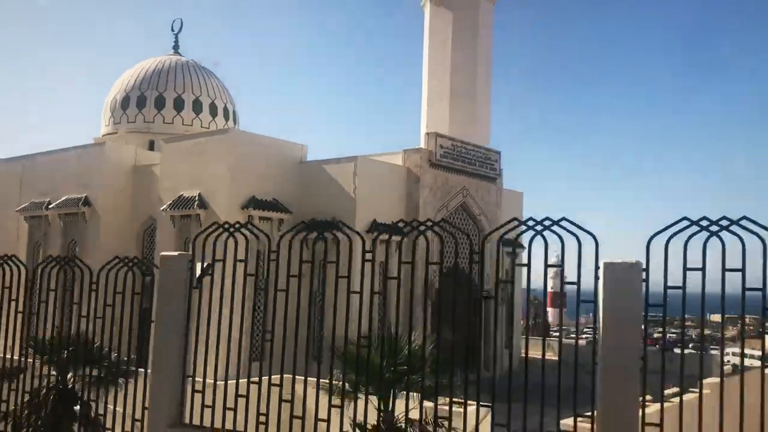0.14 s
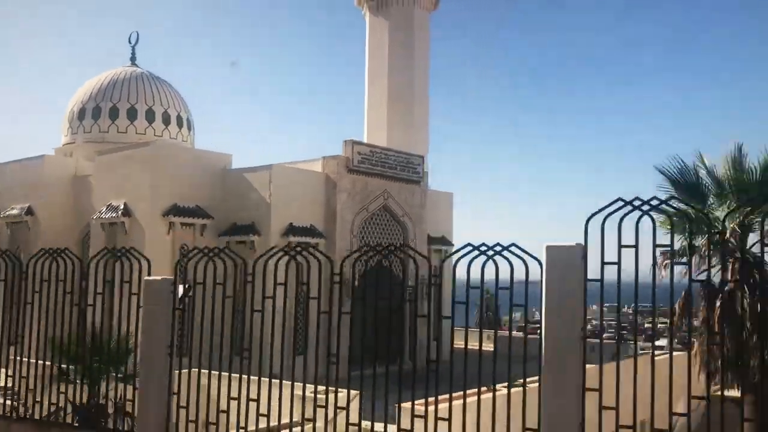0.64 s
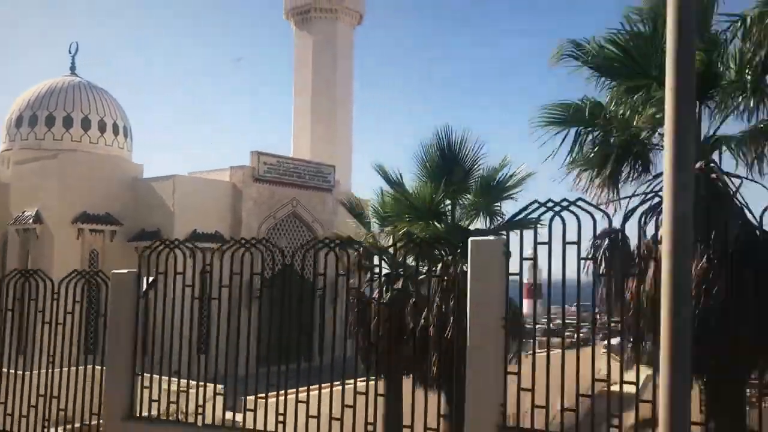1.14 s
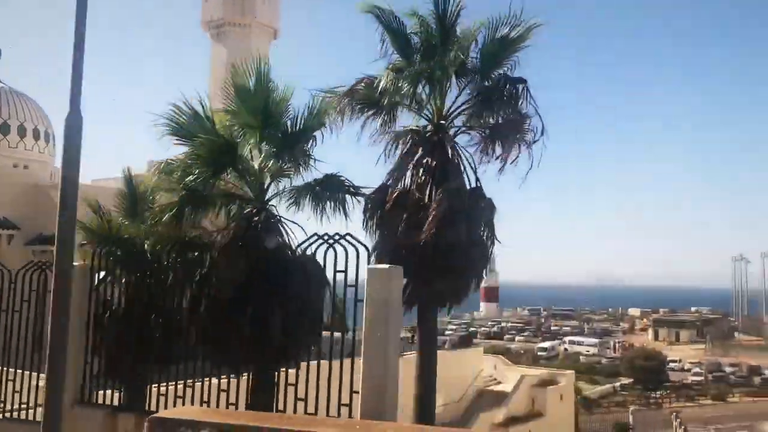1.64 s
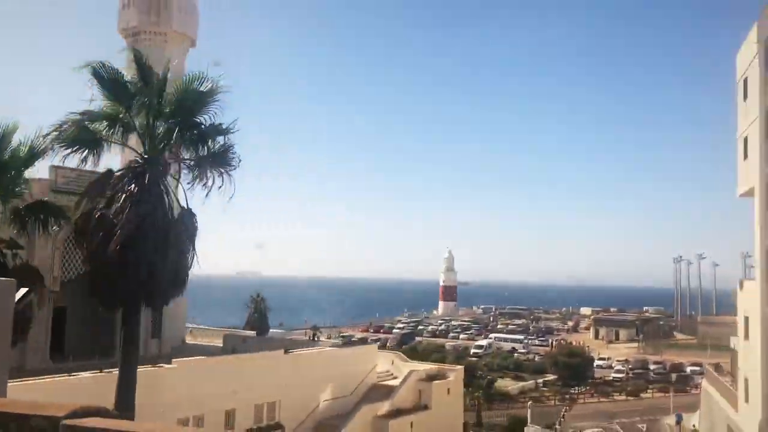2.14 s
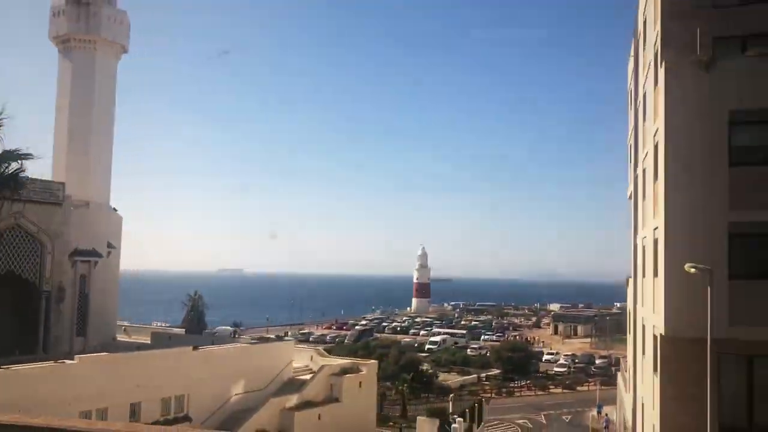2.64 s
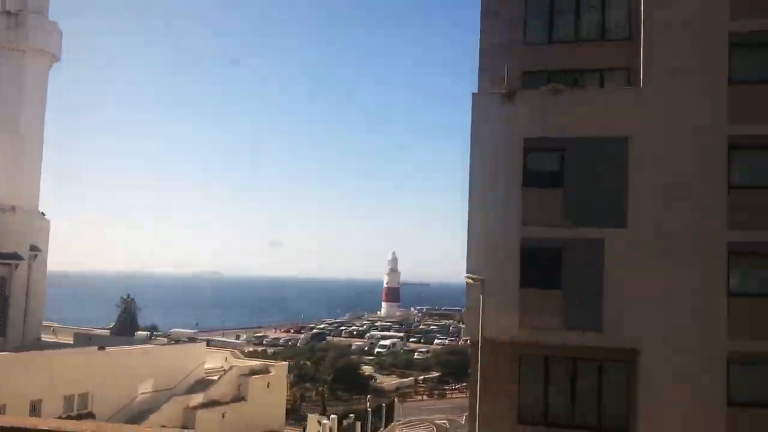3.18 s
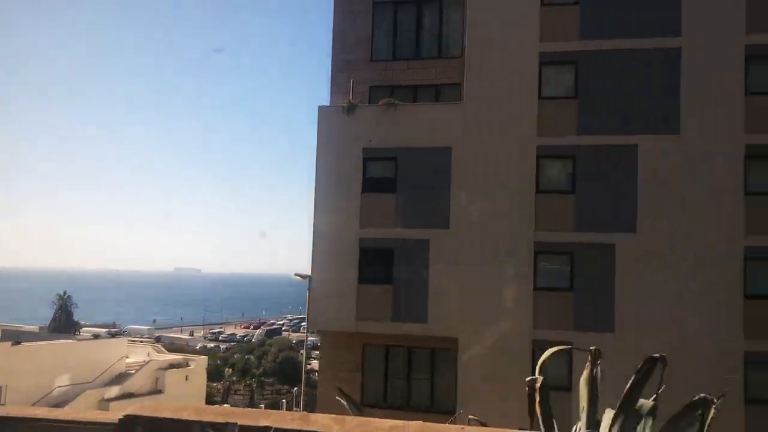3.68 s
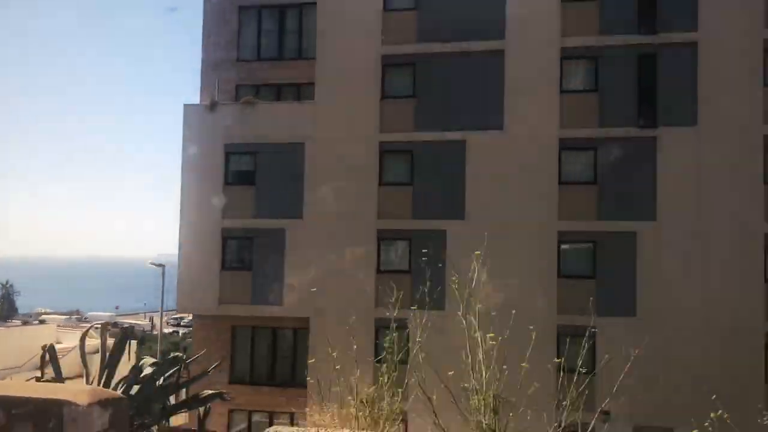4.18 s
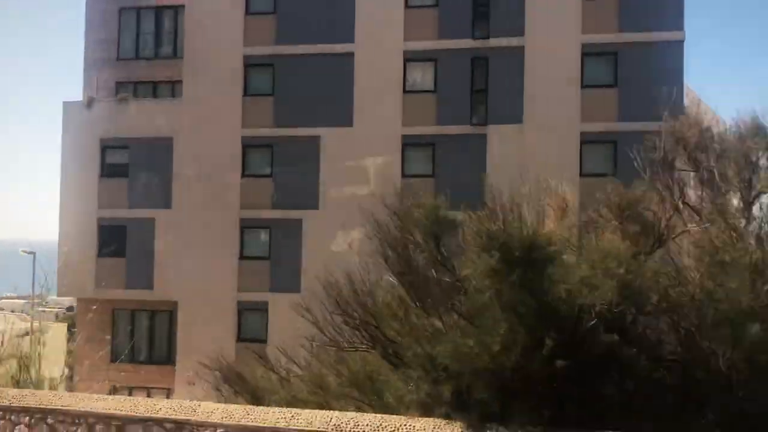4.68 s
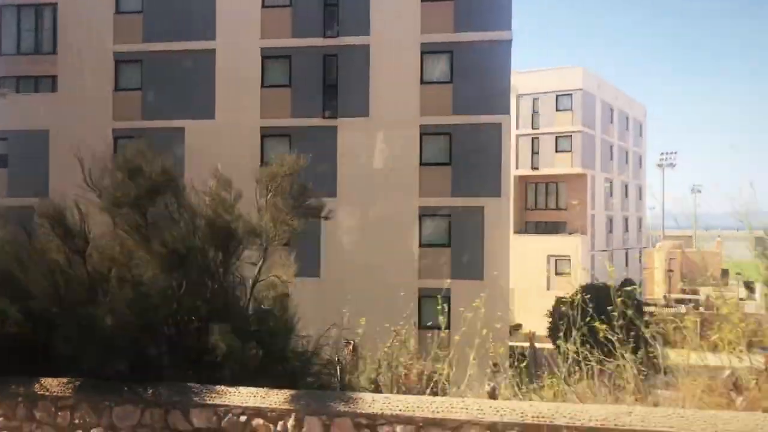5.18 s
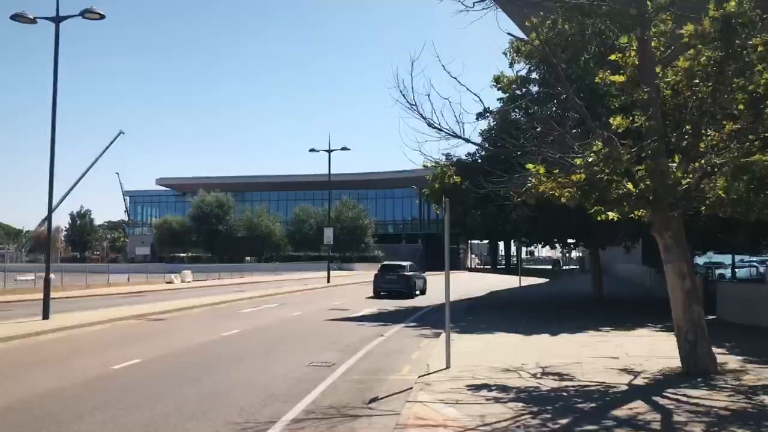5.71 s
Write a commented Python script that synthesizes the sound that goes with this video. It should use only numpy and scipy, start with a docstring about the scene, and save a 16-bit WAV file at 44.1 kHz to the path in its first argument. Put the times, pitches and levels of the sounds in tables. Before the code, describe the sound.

A bus cabin drones and rumbles, trim and windows chatter around a deep thump, then a hard cut leaves softer road noise and one thud.

```python
"""Inside a bus that slowly gathers speed: a six-cylinder diesel, built from sine lines on multiples of its
cycle, drones over a road roar of coloured noise. Trim, then windows and wall panels rattle in chattering
bursts of ringing noise. Around 3 s bumps thump the body with low decaying rings, and the drone briefly dips.
Near the end the sound cuts with a click, a wave chopped at its crest, to a quieter stretch of road noise,
where one joint thumps under the wheels."""
import sys
import numpy as np
from scipy import signal
from scipy.fft import rfft, irfft
from scipy.io import wavfile
from scipy.ndimage import uniform_filter1d

SR = 44100
rng = np.random.default_rng(int(sys.argv[2]) if len(sys.argv) > 2 else 0)


def gain_from_db(level_db):
    """Convert decibel levels to linear amplitude factors (20 dB per decade)."""
    decades = np.asarray(level_db, float) / 20
    return 10 ** decades


def store_pcm(level_fs):
    """Save levels as 16-bit WAV."""
    pcm = np.round(np.clip(level_fs, -1, 1) * 32767).astype(np.int16)
    wavfile.write(sys.argv[1], SR, np.atleast_2d(pcm).T)


N = 256818
T = np.arange(N) / SR
CUT_S = 5.6536  # the first road ends here

# narrow dips in the treble, where an echo close to the microphone cancels it:
# (centre [Hz], width [Hz], gain [dB])
ECHO_DIPS = [(4890, 230, -3.5), (7720, 240, -2.5), (10550, 620, -3.5)]
# spectrum of the quieter road: (frequency [Hz], relative density [dB per Hz])
QUIET_ROAD_COLOUR = [(20, -19), (60, -1), (110, -6.5), (200, -10.5), (380, -26), (500, -24), (800, -25.5),
                     (1100, -23.5), (1700, -29.5), (2270, -36.5), (3450, -40.5), (7000, -52), (15800, -65)]
# layers of the roar, boom, rumble, tyre roar and hiss:
# (mean level [dB], share of the surface curve [ratio], slow swell [dB], flicker [dB], flicker rate [per s])
ROAR_LAYERS = [(-35.5, 1, 0.5, 1., 5.88), (-35, 0.6, 0.66, 0.62, 11), (-41, 0.59, 0.13, 0.16, 12),
               (-52.5, 0.93, 0.47, 0.78, 22)]
# cabin colour of the roar: (frequency [Hz], relative density [dB per Hz])
CABIN_COLOUR = [(22, -24), (31, -10), (41, -12), (52, -7), (70, -10.5), (105, -13), (128, -16), (170, -8),
                (300, -16), (370, -17), (414, -19.5), (710, -21), (857, -25), (1390, -25), (1640, -29.5),
                (2590, -31), (4300, -43.5), (11600, -57), (13500, -61), (15800, -66)]
# coarseness of the road surface: (time [s], level [dB])
SURFACE_COARSENESS = [(0, -.5), (1.3, -0.5), (2, 1), (2.84, 1.5), (3.5, 1.5), (3.96, -0.5), (4.62, 1.2),
                      (5.07, -0.5), (5.48, 1.5), (5.65, -1)]
# narrow panel resonances ringing steadily in the roar: (centre [Hz], width [Hz], level [dB])
PANEL_RESONANCES = [(1775, 70, -59), (2537, 24, -64), (11730, 30, -87)]
# what each rattling part rings, the trim with a main and a top ring:
# (centre [Hz], width [Hz], relative level [dB])
TRIM_MAIN_RING = [(5500, 3100, -0.5), (8500, 4800, -4.5)]
TRIM_TOP_RING = [(11100, 3300, 3), (14000, 4000, -14)]
GLASS_RING = [(2750, 900, 0), (3700, 1300, -2)]
PANEL_RING = [(1040, 800, 8), (1660, 500, -6.5)]
# loose trim rattles: (time [s], level [dB], brightness = top ring against main ring [dB])
TRIM_JOLTS = [(.446, -57, -4), (1.13, -65, -3), (1.21, -63, -5), (1.42, -60, -4), (1.6, -55, -13),
              (1.83, -58, -13), (1.894, -54.5, -13), (2.12, -65, 0), (2.4, -64, -1), (2.662, -50.5, -11),
              (2.72, -52, -1), (2.99, -53.5, -7), (3.025, -59, -9), (3.267, -49, -9), (3.3, -72, -6),
              (3.33, -57, -4), (3.36, -63, -11), (3.395, -74, -9), (3.435, -73, -4), (4.27, -71, -2),
              (4.31, -71, -4), (4.49, -58, -16), (4.58, -64, -1), (4.7, -62, -4), (4.85, -71, -4),
              (5.34, -68, -2), (5.475, -68, -3)]
# windows rattle: (time [s], level [dB])
GLASS_JOLTS = [(1.83, -48), (1.894, -47), (2.99, -56), (3.024, -50), (3.032, -44), (3.267, -48), (3.3, -52),
               (3.33, -48), (3.357, -45), (3.4, -51), (3.435, -50), (4.49, -52)]
# wall panels rattle: (time [s], level [dB])
PANEL_JOLTS = [(1.894, -46), (2.662, -44), (2.72, -42.5), (2.99, -43), (3.26, -40.5), (3.32, -50),
               (3.37, -46.5), (3.98, -45.5), (4.49, -46)]
# random level jumps that make a rattle chatter: (jump rate [per s], spread [dB])
CHATTER_JUMPS = [(150, 1.3), (600, 2.2)]
# wheels over bumps: (time [s], level [dB], settled body ring [Hz], decay t60 [s], rise [s])
WHEEL_BUMPS = [(2.96, -30, 28, .4, .02), (3.235, -7.5, 62, .3, .03), (3.31, -15.5, 74, .3, .015),
               (3.2, -24, 158, .25, .02), (3.42, -23, 187, .5, .03), (3.75, -27, 160, .3, .02),
               (5.764, -7.5, 80, .055, .004), (5.783, -19, 90, .12, .002), (5.7975, -25, 240, .03, .001)]
# engine cycle rate, half the crank speed: (time [s], rate [Hz])
CYCLE_RATE = [(0, 9.27), (.5, 9.34), (2, 9.76), (3.5, 10.24), (4, 10.44), (5, 10.77), (5.65, 10.91)]
# the three strongest engine lines [multiples of the cycle rate], the first being the firing rate;
# the upper one runs a shade fast, so the three slowly fall out of step
MAIN_MULTIPLES = (6, 9, 12.015)
# their levels before the brief dip: (time [s], firing [dB], middle line [dB], upper line [dB])
MAIN_LEVELS = [(0, -29, -26, -32), (.3, -26.5, -26, -35), (.7, -27, -30.5, -42), (1, -23.5, -26, -40),
               (1.3, -25, -25, -36), (1.6, -27, -27, -31), (2, -26.5, -26, -31), (2.35, -36, -26, -29),
               (2.7, -35, -26, -33), (3.1, -34, -26, -32), (3.6, -28, -27, -34.5), (3.9, -29, -23, -35),
               (4.15, -33, -24, -35), (4.45, -33, -29, -35.5), (4.85, -32, -23, -33),
               (5.05, -31, -27, -29.5), (5.3, -31, -35, -30), (5.65, -31.5, -29, -30)]
# weaker lines swell as rising speed carries them through a body resonance:
# (multiple of cycle rate, top level [dB], cycle rate at the top [Hz], half width in cycle rate [Hz])
MINOR_LINES = [(5, -43, 10.7, .6), (7, -38, 10.8, .4), (7, -41, 9.4, .4), (7.5, -38, 9.95, .15),
               (8, -41, 9.4, .4), (8, -41, 10.7, .4), (10, -41, 9.7, 1), (11, -44, 10.5, 3),
               (13, -45, 9.5, .6), (14, -41, 9.4, .6), (15, -42, 10.1, 1.2), (16, -34, 10.75, .33),
               (16, -35, 10, .2), (18.1, -36, 10, .35), (19, -48, 10.2, .9), (20, -45, 9.62, .1),
               (22, -38, 9.31, .04), (24, -44, 10.2, .9), (26, -46, 9.3, .3), (27, -46, 9.85, .2),
               (29, -41.5, 10.65, .3), (29, -44.5, 9.6, .45), (30, -45, 10.6, .25), (32, -50, 9.85, .4),
               (48.1, -48.5, 9.45, .4), (48.1, -53, 10.35, .2), (58.2, -51.5, 9.75, .45),
               (64.1, -50, 9.36, .14), (64.1, -53, 10.15, .12), (61, -53, 10.4, .2), (66, -54, 10.7, .2),
               (80.2, -54, 9.45, .2)]


def unit(x):
    """Scale to rms 1."""
    return x / np.sqrt(np.mean(x ** 2))


def walk(rate):
    """Random levels held 1 / rate s and slewed twice; rms 1."""
    hold = int(SR / rate)
    steps = np.repeat(rng.standard_normal(N // hold + 1), hold)
    slewed = uniform_filter1d(uniform_filter1d(steps, hold), hold)
    return unit(slewed[:N])


def shaped(gain):
    """Noise with a gain curve over frequency in Hz, with the echo dips and nothing from 15830 Hz up."""
    hz = np.maximum(np.arange(N // 2 + 1) * SR / N, 1)
    dips_db = sum(db * np.exp(-((hz - centre_hz) / width_hz) ** 2) for centre_hz, width_hz, db in ECHO_DIPS)
    spectrum = rfft(rng.standard_normal(N)) * gain(hz) * gain_from_db(dips_db)
    return irfft(spectrum * (hz < 15830), N)


def peak(hz, width_hz):
    """Noise of rms 1 in one steep resonance."""
    return unit(shaped(lambda f: 1 / (1 + ((f * f - hz * hz) / (f * width_hz)) ** 2)))


def resonances(table):
    """Several noise-fed resonances sounding together."""
    return sum(gain_from_db(db) * peak(hz, width_hz) for hz, width_hz, db in table)


def colour(table, lo_hz, hi_hz):
    """Gain curve of a spectrum table, with soft crossovers at both edges."""
    hz, db = np.transpose(table)

    def gain(f):
        crossovers = np.sqrt((1 + (lo_hz / f) ** 8) * (1 + (f / hi_hz) ** 8))
        return gain_from_db(np.interp(np.log(f), np.log(hz), db)) / crossovers
    return gain


def quiet_road():
    """The quieter road: steady noise at -32.5 dB rms in its own colour."""
    return gain_from_db(-32.5) * unit(shaped(colour(QUIET_ROAD_COLOUR, 1, 30000)))


def road():
    """Boom, rumble, tyre roar and hiss share the cabin colour; they follow the surface, swell and flicker."""
    out = resonances(PANEL_RESONANCES)
    surface_db = np.interp(T, *np.transpose(SURFACE_COARSENESS))
    edges_hz = (1, 130, 450, 3500, 30000)
    for layer, lo_hz, hi_hz in zip(ROAR_LAYERS, edges_hz, edges_hz[1:]):
        mean_db, share, swell_db, flicker_db, flicker_rate = layer
        level_db = mean_db + share * surface_db
        level_db = level_db + swell_db * walk(2.29) + flicker_db * walk(flicker_rate)
        out = out + gain_from_db(level_db) * unit(shaped(colour(CABIN_COLOUR, lo_hz, hi_hz)))
    return out


def rattle(jolts, ring, rise_s, hold_s, t60_s):
    """Each jolt starts a chattering burst that rings one part, holds a moment and dies away."""
    strength = np.zeros(N)
    for start_s, db in jolts:
        age = np.maximum(T - start_s, 0)
        decay = gain_from_db(db - 60 * np.maximum(age - hold_s, 0) / t60_s)
        strength += decay * (1 - np.exp(-age / rise_s))
    chatter_db = sum(db * walk(rate) for rate, db in CHATTER_JUMPS)
    return strength * gain_from_db(chatter_db) * unit(resonances(ring))


def trim_rattles():
    """Loose trim rings a main and a top band; faint ticks join at random moments."""
    ticks_per_s, tick_db, spread_db, bright_db = 1.3, -70, 1.5, -2
    draws = rng.random((int(ticks_per_s * CUT_S), 2))
    ticks = [(CUT_S * a, tick_db + spread_db * (2 * b - 1), bright_db) for a, b in draws]
    jolts = TRIM_JOLTS + ticks
    main_jolts = [(s, db) for s, db, _ in jolts]
    top_jolts = [(s, db + bright) for s, db, bright in jolts]
    fade = dict(rise_s=.007, hold_s=.018, t60_s=.24)
    return rattle(main_jolts, TRIM_MAIN_RING, **fade) + rattle(top_jolts, TRIM_TOP_RING, **fade)


def glass_rattles():
    """Windows, small and stiff in sound: quick to start and short in ring."""
    return rattle(GLASS_JOLTS, GLASS_RING, rise_s=.002, hold_s=.005, t60_s=.12)


def panel_rattles():
    """Wall panels, the larger parts: softer to start and longer in ring."""
    return rattle(PANEL_JOLTS, PANEL_RING, rise_s=.012, hold_s=.035, t60_s=.3)


def bumps():
    """A blow on the tyre rings the body low and briefly; the pitch starts sharp and sags as the tyre relaxes."""
    out = 0
    for start_s, db, hz, t60_s, rise_s in WHEEL_BUMPS:
        age = np.maximum(T - start_s, 0)
        # the sag dies away with a 4 ms time constant
        cycles = hz * (age + .0056 * (1 - np.exp(-age / .004)))
        envelope = gain_from_db(db - 60 * age / t60_s) * (1 - np.exp(-age / max(rise_s, 1e-4)))
        out = out + envelope * np.sin(2 * np.pi * cycles)
    return out


def engine():
    """Sine lines on multiples of the cycle; the strongest start in step, the weaker waver more."""
    times, *main_db = np.transpose(MAIN_LEVELS)
    cycle_hz = np.interp(T, *np.transpose(CYCLE_RATE))
    first_beat_s = .01
    angle = 2 * np.pi * (np.cumsum(cycle_hz) / SR - cycle_hz[0] * first_beat_s)
    # the strongest lines dip briefly just after the big bump
    dip_db = -11 * np.exp(-((T - 3.33) / .13) ** 2)
    # each line: multiple, level [dB], waver [dB], starting phase [rad]
    lines = [(k, np.interp(T, times, db) + dip_db, .3, 0) for k, db in zip(MAIN_MULTIPLES, main_db)]
    for k, top_db, top_hz, half_hz in MINOR_LINES:
        level_db = top_db - 20 * np.log10(1 + ((cycle_hz - top_hz) / half_hz) ** 2)
        lines.append((k, level_db, 1.8, 2 * np.pi * rng.random()))
    out = 0
    for k, level_db, waver_db, start in lines:
        phase = start + .15 * waver_db * walk(3)
        level = np.sqrt(2) * gain_from_db(level_db + waver_db * walk(3.99))  # rms to peak
        out = out + level * np.sin(k * angle + phase)
    return out


def scene():
    """First road up to the cut, where a rising wave is chopped at its crest; then the quieter road."""
    crest_shape = np.exp(-((T - CUT_S) / .0016) ** 4)
    ride = road() + trim_rattles() + glass_rattles() + panel_rattles() + engine()
    first = ride * (1 - crest_shape) + gain_from_db(-15.4) * crest_shape
    return (np.where(T < CUT_S, first, quiet_road()) + bumps())[None]


def low_pass(x):
    """Removes everything above the highest recorded frequency."""
    return signal.sosfilt(signal.butter(12, 16320, fs=SR, output="sos"), x)


def record(dry):
    """Deliver the finished mix."""
    return low_pass(dry)


dry = scene()
out = record(dry)
store_pcm(out)
```